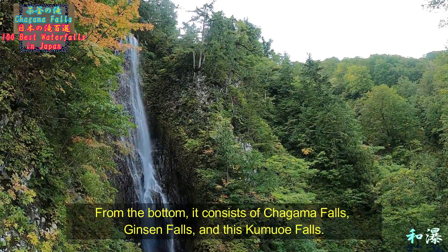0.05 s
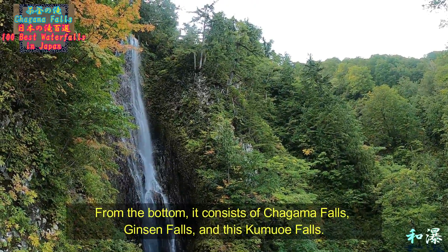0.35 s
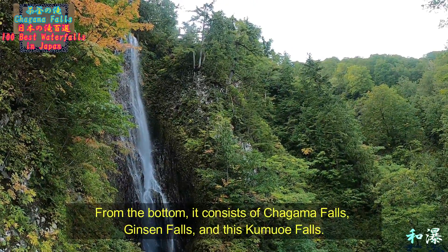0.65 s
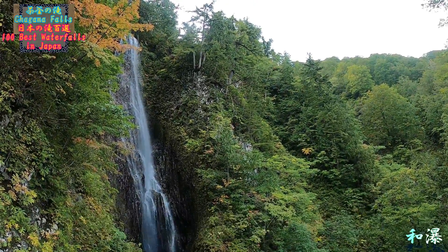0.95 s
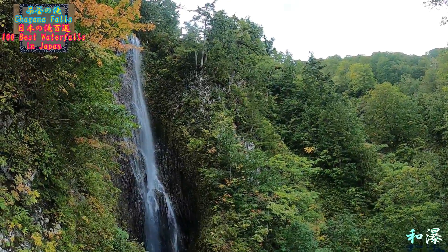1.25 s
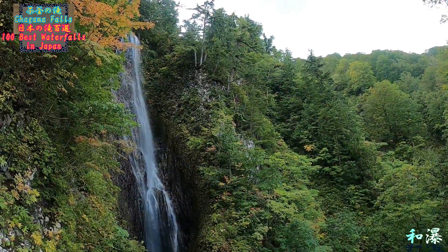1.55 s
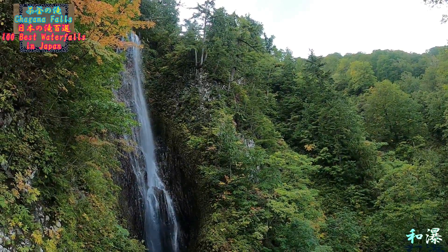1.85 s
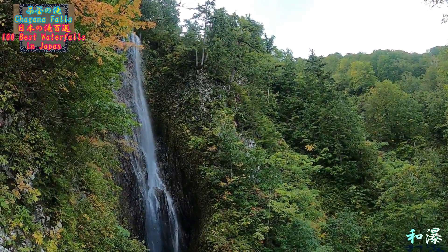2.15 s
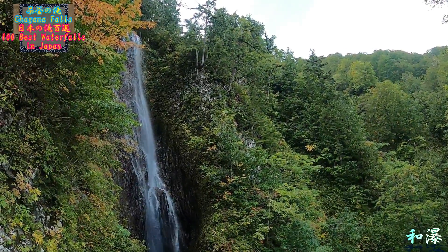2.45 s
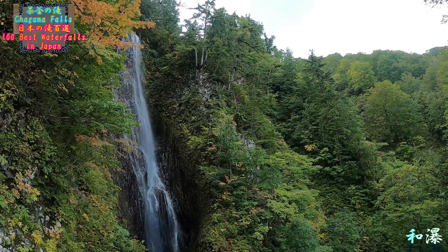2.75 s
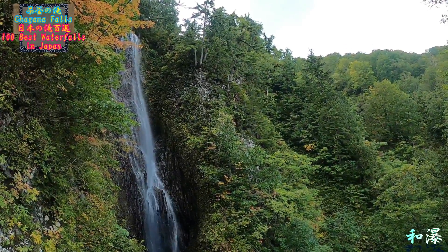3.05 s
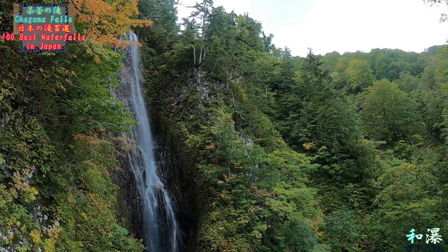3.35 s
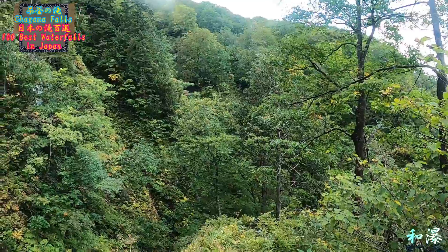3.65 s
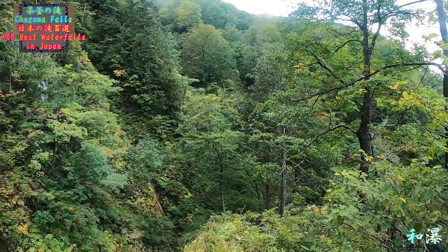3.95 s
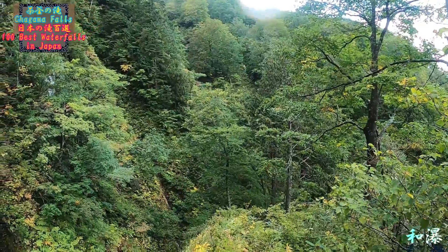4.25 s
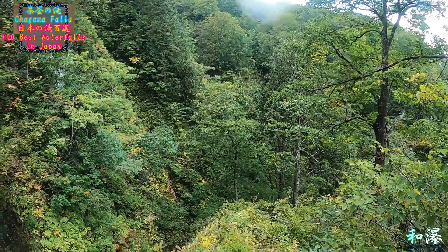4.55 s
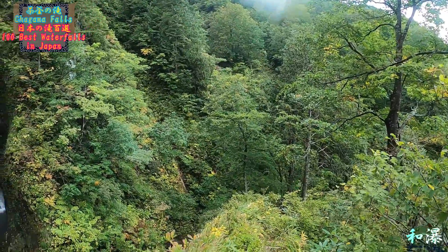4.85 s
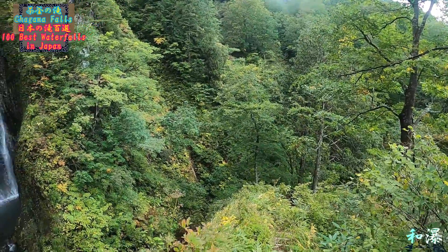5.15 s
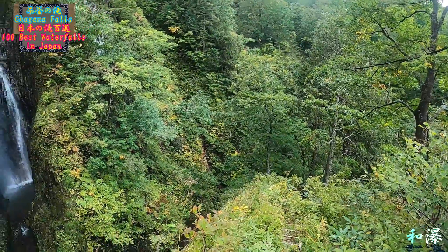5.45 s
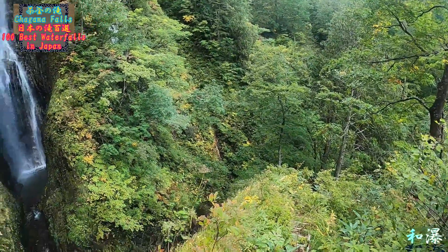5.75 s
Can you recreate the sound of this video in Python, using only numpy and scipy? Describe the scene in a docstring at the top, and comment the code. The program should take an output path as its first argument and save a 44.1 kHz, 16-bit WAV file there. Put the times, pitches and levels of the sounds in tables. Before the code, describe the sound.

A tall waterfall is heard from across a wooded gorge as one even, broad rush with no separate splashes. It is almost mono, slightly wider in the high hiss. It starts a little louder and settles within the first second, while light wind rumbles on the microphone, with soft bumps near 0.1 and 0.9 seconds. The water holds steady until about 3.5 seconds, when everything cuts out abruptly. At about 3.7 seconds the rush fades back in over half a second, a little louder and slightly different in tone. Wind builds with it, buffeting the microphone with low, irregular thumps and flutter from about 3.8 to 4.8 seconds, strongest around 4.5. The wind then eases, with a faint rumble near 5.6 seconds, and the rush continues, sinking very slightly, to the end at about 6 seconds.

```python
"""A tall waterfall heard across a wooded gorge: countless far splashes add incoherently to one even rush.
The microphone first faces up at the lip; after an abrupt pause the rush fades in again, facing the pool.
Turbulent wind buffets the microphone, lightly at first and in one stronger gust after the pause.
The sound is almost mono, slightly wider in the high hiss."""
import sys
import numpy as np
from scipy import signal
from scipy.fft import rfft, irfft
from scipy.io import wavfile

SR = 44100
rng = np.random.default_rng(int(sys.argv[2]) if len(sys.argv) > 2 else 0)


def dump_mix(stems):
    """Bounce the given channels to the path in sys.argv[1] as a 16-bit WAV at rate SR."""
    frames = np.atleast_2d(stems).T  # one column per channel
    limited = np.clip(frames, -1, 1)  # hard clip at full scale
    pcm = np.round(limited * 32767).astype(np.int16)
    wavfile.write(sys.argv[1], SR, pcm)


N = 264776


def from_db(db):
    """Amplitude ratio of a level: tenfold for every 20 dB."""
    return 10 ** (np.asarray(db) / 20)


def seconds():
    """The time of every sample."""
    return np.arange(N) / SR


def bin_hz():
    """Frequencies of the Fourier components of a whole signal."""
    return np.arange(N // 2 + 1) * SR / N


def curve(points):
    """Interpolation of (Hz, value) points on a log-frequency axis, one value per Fourier component."""
    knots, values = np.transpose(points)
    return np.interp(np.log(np.maximum(bin_hz(), 1)), np.log(knots), values)


def noise(gain):
    """Linear filtering: white noise takes on the spectral shape of the gain."""
    return irfft(rfft(rng.standard_normal(N)) * gain, N)


def drift(corner_hz):
    """Random modulation: low-passed noise with standard deviation 1."""
    slow = noise(1 / (1 + (bin_hz() / corner_hz) ** 2))
    return slow / slow.std()


def rush(spectrum, housing, level_db, surge_db, surge_hz):
    """Incoherent splashes sum to noise that swells as clumps of water land; level_db holds above 700 Hz."""
    # stereo width (side over mid), almost mono, slightly wider in the high hiss: frequency_hz, level_db
    width = [(100, -55.5), (700, -44.5), (1400, -64), (2800, -47), (5500, -29), (9000, -26.5), (13000, -7)]
    hz = bin_hz()
    colour_db = curve(spectrum)
    for centre_hz, width_hz, gain_db in housing:
        colour_db += gain_db * np.exp(-2 * ((hz - centre_hz) / width_hz) ** 2)
    gain = from_db(colour_db) * (hz > 12)
    gain /= np.sqrt(np.mean((gain * (hz > 700)) ** 2))
    mid = noise(gain)
    side = noise(gain * from_db(curve(width)))
    stereo = mid + side * np.array([[1], [-1]])
    return stereo * from_db(level_db + surge_db * drift(surge_hz))


def rush_facing_lip():
    """The rush filtered by the housing's upward response; it starts a little louder and settles."""
    # relative spectral density of the rush: frequency_hz, level_db
    spectrum = [(25, 1.5), (100, 0), (260, 0.5), (560, -5.5), (1400, -3.5), (5500, -14), (9500, -21),
                (11400, -33), (13500, -34.5), (15500, -44)]
    # peaks and dips of the microphone housing, facing up: centre_hz, width_hz, gain_db
    housing = [(354, 49, 1.5), (774, 99, 3), (1040, 86, -0.5), (1450, 620, 1.3), (2070, 230, -1.2),
               (2400, 430, 2), (3284, 330, -3.5), (4110, 770, 6), (7770, 880, -6.5)]
    settled_db, extra_db, settle_s = -35, 3, 0.66
    level_db = settled_db + extra_db * np.exp(-(seconds() / settle_s) ** 2)
    return rush(spectrum, housing, level_db, surge_db=0.39, surge_hz=22)


def gust_gains():
    """Independent gusts add in power to a steady breeze; gives the gains of the big and small eddies."""
    # gusts with exponential flanks: peak_s, level_db, rise_s, fall_s, small_share (of the power, 0-1)
    gusts = [(.1, -30, 0.33, 0.12, 0.0), (.9, -34.5, .11, 0.13, 0.85), (4.02, -32.5, 0.33, 0.33, 0.67),
             (4.33, -28, .07, .1, 0.1), (4.44, -23, 0.056, 0.074, 1), (4.54, -21, 0.079, 0.041, 0.65),
             (4.76, -32, .07, 0.074, .8), (5.21, -38, .03, .05, 0.2), (5.63, -36.5, 0.13, .25, 0.3)]
    breeze_db, breeze_small_share = -47, .15
    t = seconds()
    total_power = from_db(breeze_db) ** 2
    small_power = total_power * breeze_small_share
    for peak_s, level_db, rise_s, fall_s, small_share in gusts:
        flank_s = np.where(t < peak_s, rise_s, fall_s)
        power = (from_db(level_db) * np.exp(-abs(t - peak_s) / flank_s)) ** 2
        total_power += power
        small_power += power * small_share
    return np.sqrt(total_power - small_power), np.sqrt(small_power)


def wind(lump_db, lump_hz):
    """Turbulence at the microphone: big eddies buffet deeply, small ones flutter higher, in lumps."""
    # relative spectral density of the big eddies: frequency_hz, level_db
    buffet_spectrum = [(12, 8), (25, 2.5), (50, 2), (100, -12), (200, -33), (450, -48.5), (1200, -65.5)]
    # relative spectral density of the small eddies: frequency_hz, level_db
    flutter_spectrum = [(25, -6.5), (60, -1), (110, 2), (185, -3), (260, -7.5), (380, -12.5), (520, -13),
                        (750, -29.5), (3000, -75.5)]
    # band edges of the rumble: low_hz, high_hz
    rumble_band = [10, 780]
    big, small = gust_gains()
    buffet = noise(from_db(curve(buffet_spectrum)))
    flutter = noise(from_db(curve(flutter_spectrum)))
    rumble = big * buffet / buffet.std() + small * flutter / flutter.std()
    lumps = rumble * from_db(lump_db * drift(lump_hz))
    return signal.sosfilt(signal.butter(2, rumble_band, "band", fs=SR, output="sos"), lumps)


def eddies():
    """An eddy carried past the microphone makes a bipolar pulse: one soft swing of suction and pressure."""
    # single strong eddies: centre_s, peak_db, frequency_hz
    passages = [(0.112, -27, 40), (0.919, -31, 190), (3.806, -26.5, 75.4), (4.002, -23, 45.3),
                (4.105, -25, 100), (4.246, -23.5, 150), (4.449, -18, 152), (4.532, -15, 190),
                (4.576, -23, 110), (4.683, -24.5, 189), (4.737, -19, 127)]
    t, pressure = seconds(), np.zeros(N)
    for centre_s, peak_db, frequency_hz in passages:
        phase = 2 * np.pi * frequency_hz * (t - centre_s)
        pressure += from_db(peak_db) * phase * np.exp((1 - phase ** 2) / 2)
    return pressure


def rush_facing_pool(elapsed_s):
    """The rush filtered by the housing's downward response; it is louder and sinks slowly."""
    # relative spectral density of the rush: frequency_hz, level_db
    spectrum = [(25, -4.5), (100, -5.5), (260, -5), (560, -11.5), (1400, -9), (5200, -15.5), (8500, -24.5),
                (11400, -41.5), (13500, -50.5), (15500, -59)]
    # peaks and dips of the microphone housing, facing down: centre_hz, width_hz, gain_db
    housing = [(370, 50, 3.5), (746, 230, 4), (2030, 390, 2.2), (2830, 370, -2.5), (3400, 360, 1.8),
               (7630, 460, -2.5), (8430, 360, 2.5)]
    start_db, sink_db_per_s = -31.5, 1
    level_db = start_db - sink_db_per_s * elapsed_s
    return rush(spectrum, housing, level_db, surge_db=0.37, surge_hz=17)


def scene():
    """Superposition of water and wind: facing the lip, a pause, then facing the pool."""
    stop_s, trail_db, trail_db_per_s = 3.493, -27, 1301.5
    resume_s, fade_s, soft_start_s = 3.717, 0.17, 0.047
    t = seconds()
    since_stop, since_resume = np.maximum(t - stop_s, 0), np.maximum(t - resume_s, 0)
    lip = rush_facing_lip()
    pool = rush_facing_pool(since_resume)
    buffeting = wind(lump_db=2.0, lump_hz=25.1)
    stop = np.where(t < stop_s, 1, from_db(trail_db - trail_db_per_s * since_stop))
    fade_in = (1 - np.exp(-since_resume / fade_s)) * np.tanh(since_resume / soft_start_s)
    return stop * (lip + buffeting) + fade_in * (pool + buffeting) + eddies()


def record(dry):
    """Band limiting: an elliptic low-pass cuts the top treble steeply."""
    cutoff_hz = 15600
    return signal.sosfilt(signal.ellip(10, .1, 80, cutoff_hz, fs=SR, output="sos"), dry)


dry = scene()
out = record(dry)
dump_mix(out)
```